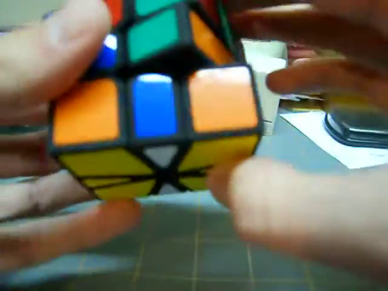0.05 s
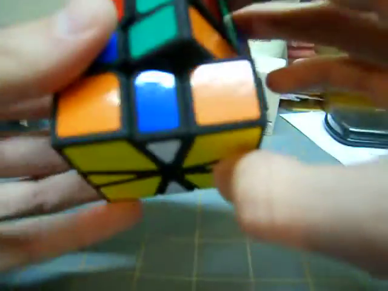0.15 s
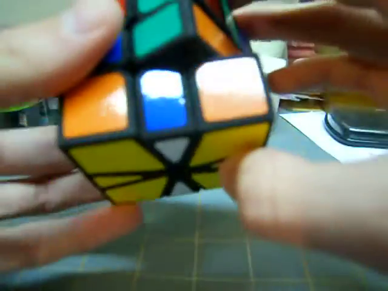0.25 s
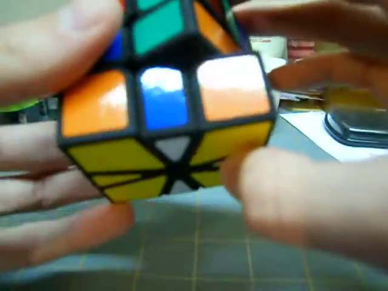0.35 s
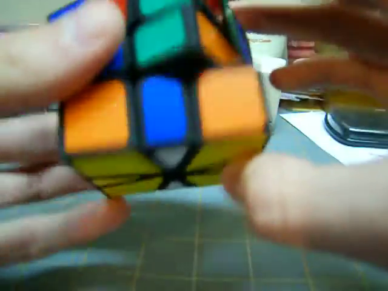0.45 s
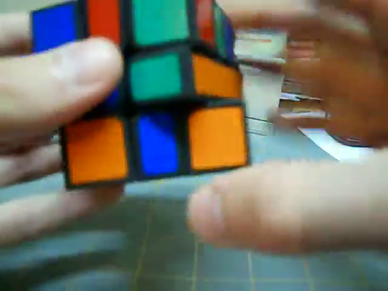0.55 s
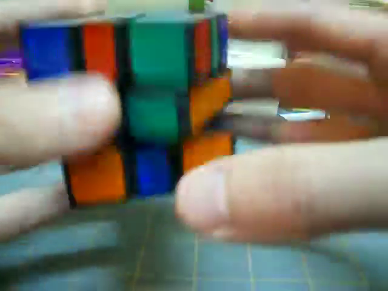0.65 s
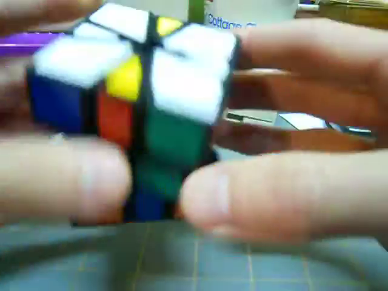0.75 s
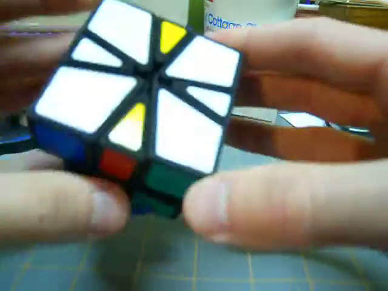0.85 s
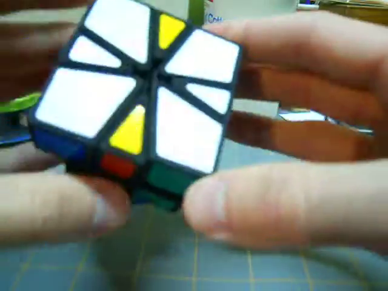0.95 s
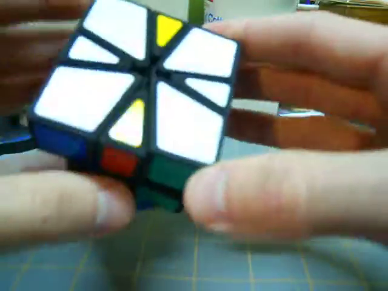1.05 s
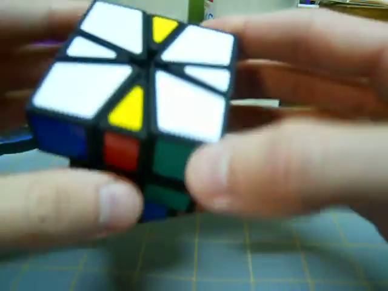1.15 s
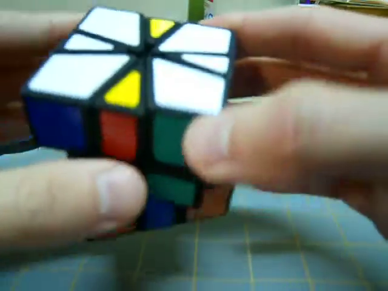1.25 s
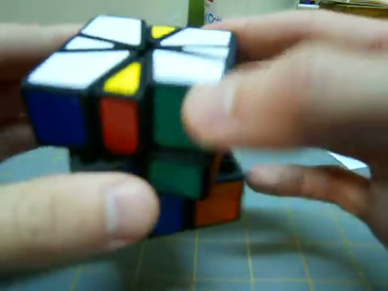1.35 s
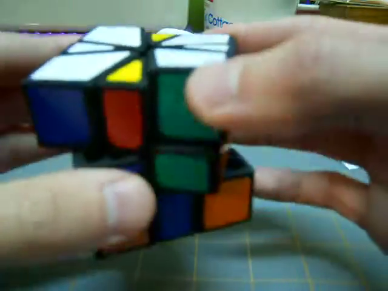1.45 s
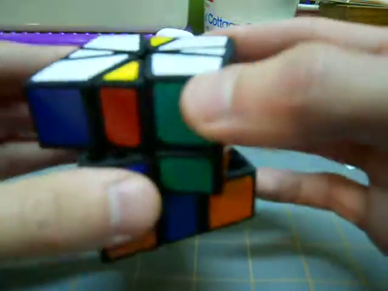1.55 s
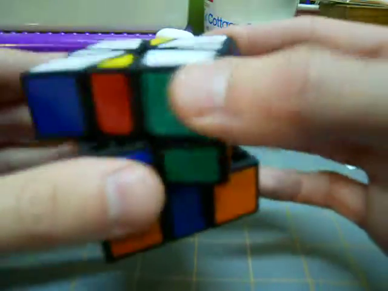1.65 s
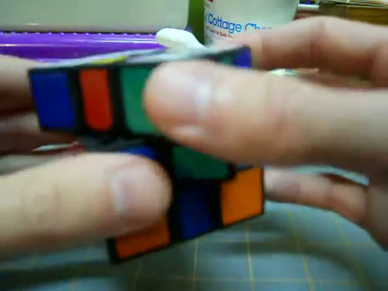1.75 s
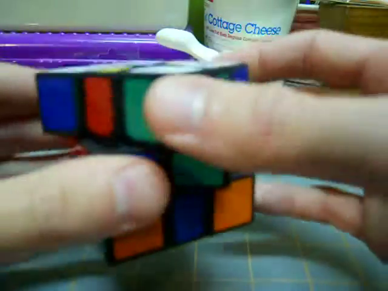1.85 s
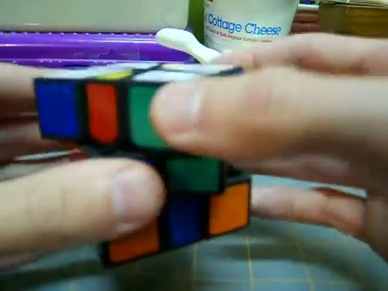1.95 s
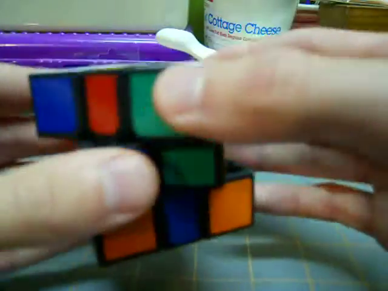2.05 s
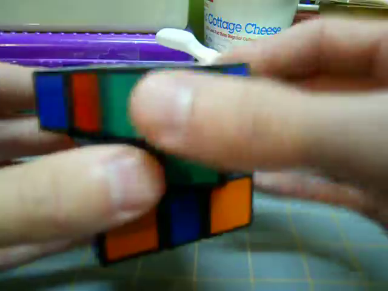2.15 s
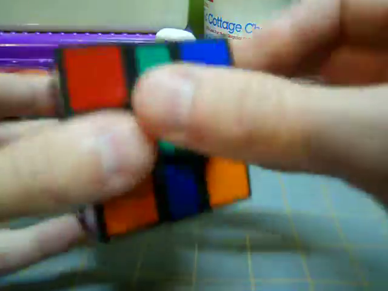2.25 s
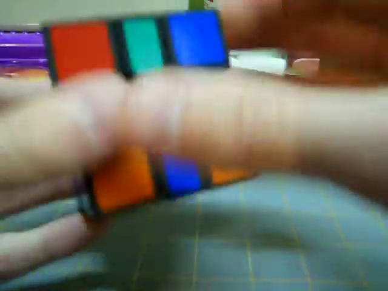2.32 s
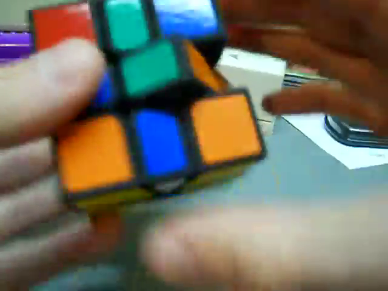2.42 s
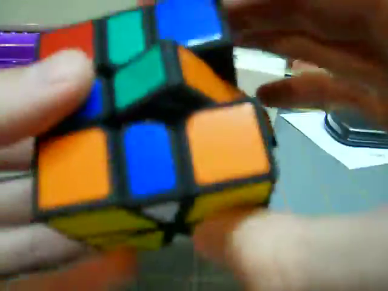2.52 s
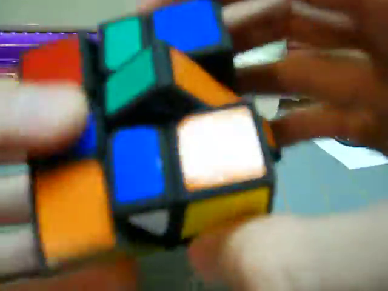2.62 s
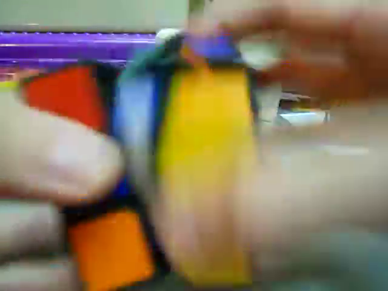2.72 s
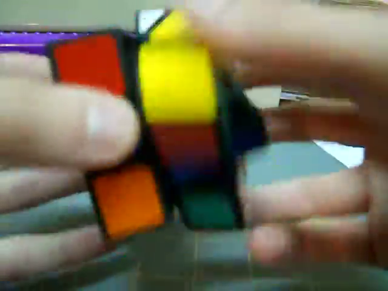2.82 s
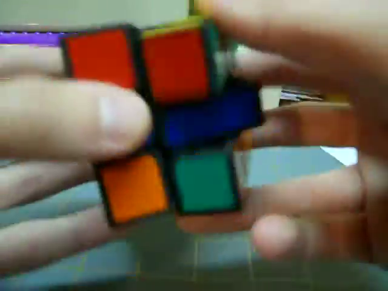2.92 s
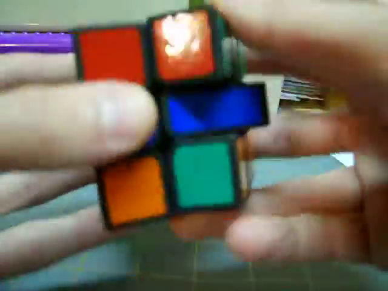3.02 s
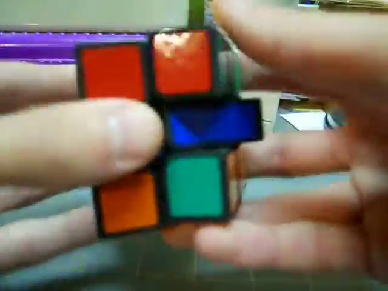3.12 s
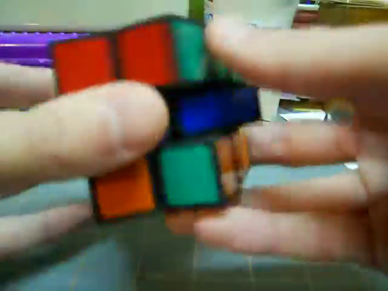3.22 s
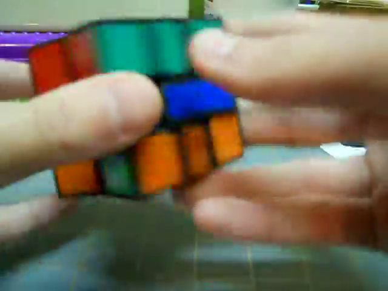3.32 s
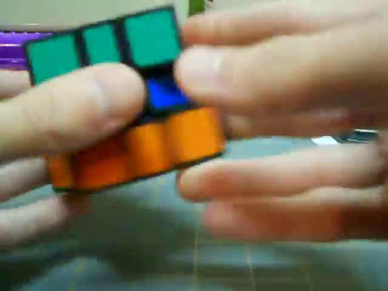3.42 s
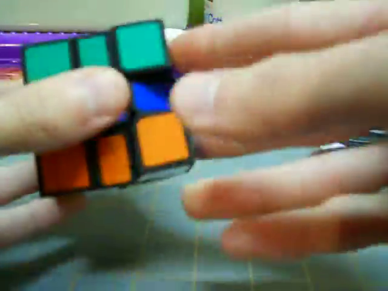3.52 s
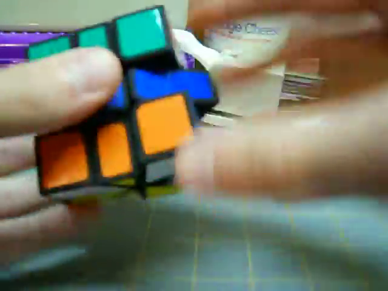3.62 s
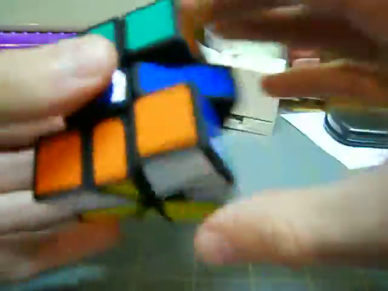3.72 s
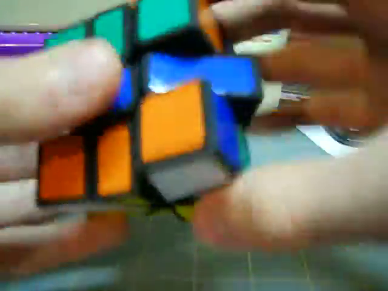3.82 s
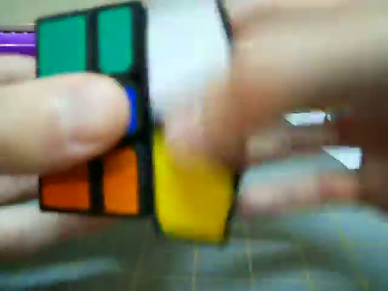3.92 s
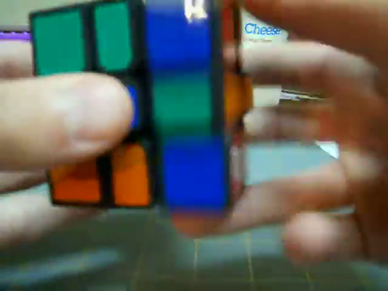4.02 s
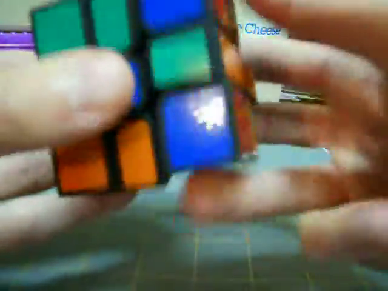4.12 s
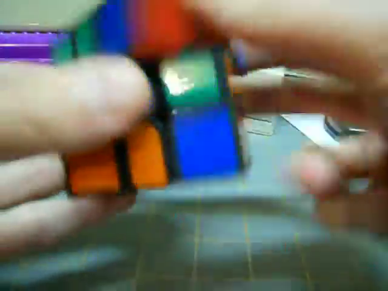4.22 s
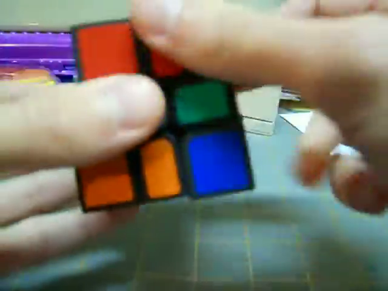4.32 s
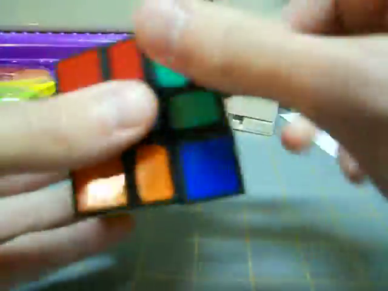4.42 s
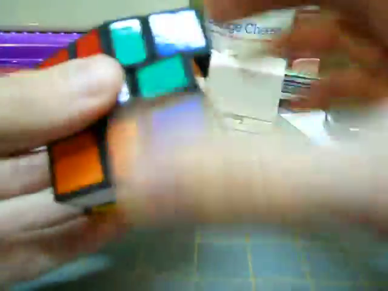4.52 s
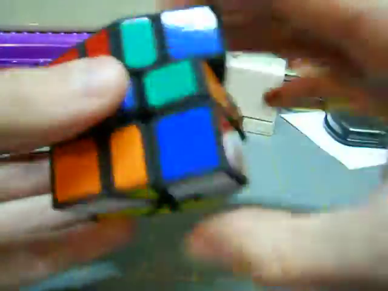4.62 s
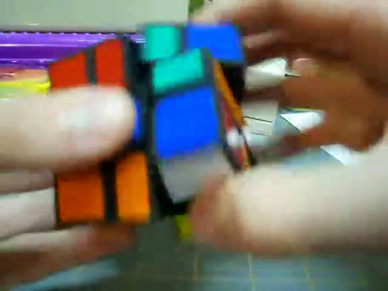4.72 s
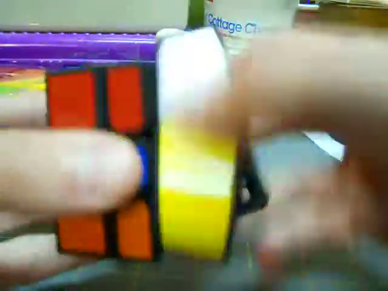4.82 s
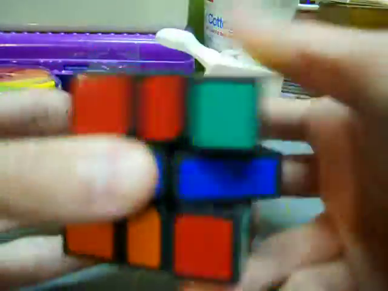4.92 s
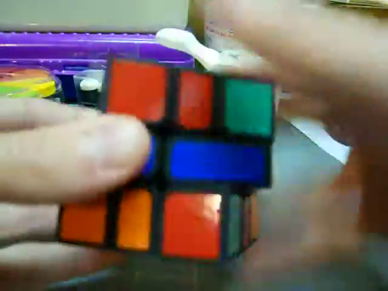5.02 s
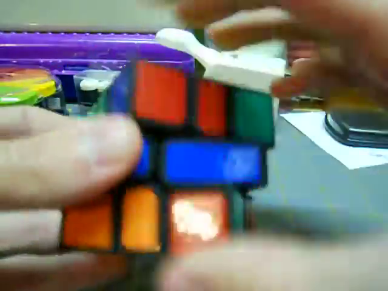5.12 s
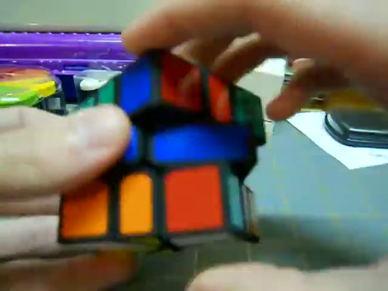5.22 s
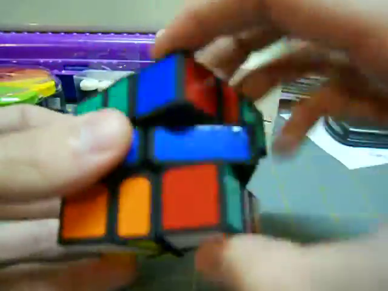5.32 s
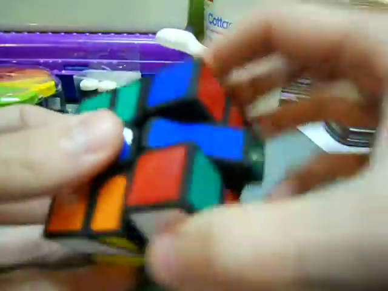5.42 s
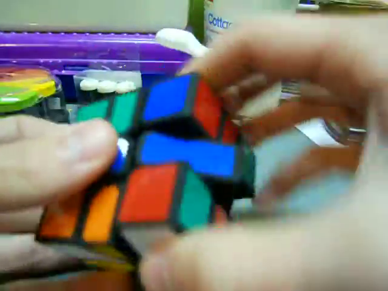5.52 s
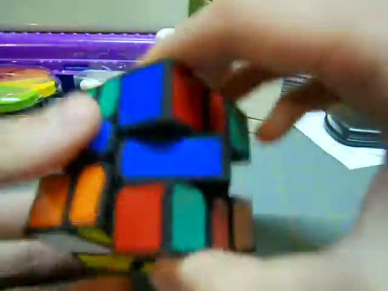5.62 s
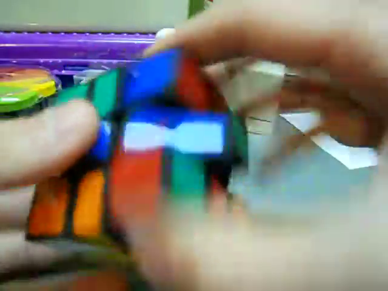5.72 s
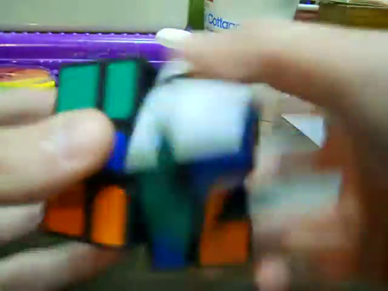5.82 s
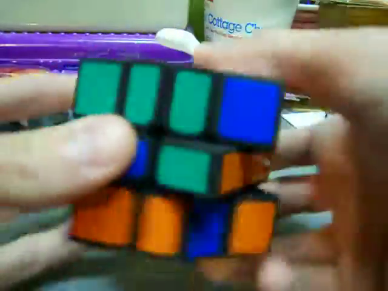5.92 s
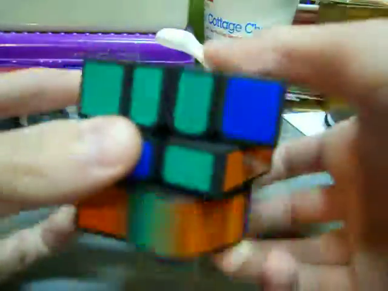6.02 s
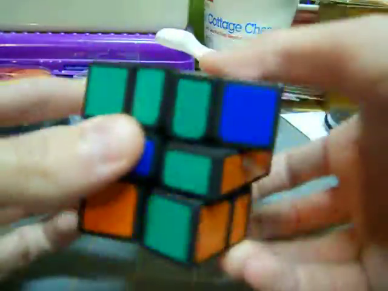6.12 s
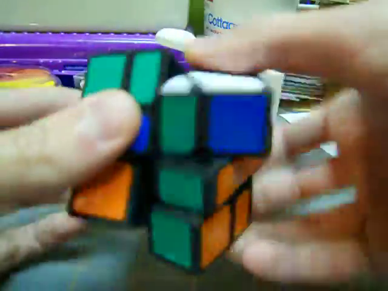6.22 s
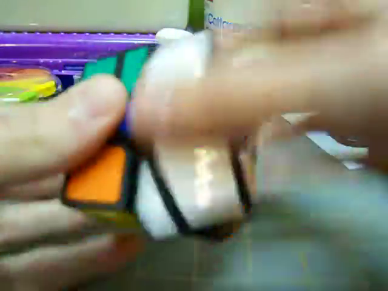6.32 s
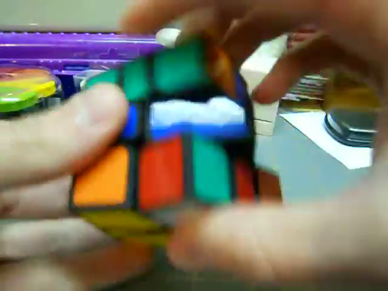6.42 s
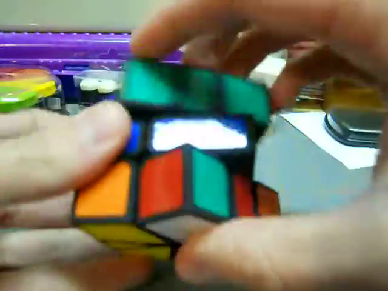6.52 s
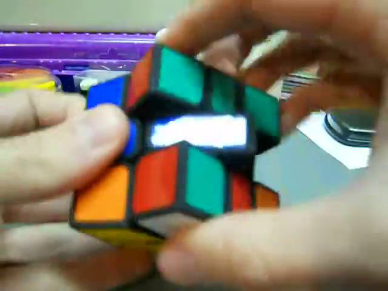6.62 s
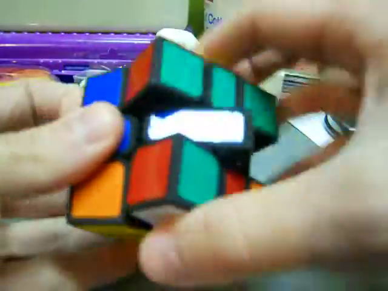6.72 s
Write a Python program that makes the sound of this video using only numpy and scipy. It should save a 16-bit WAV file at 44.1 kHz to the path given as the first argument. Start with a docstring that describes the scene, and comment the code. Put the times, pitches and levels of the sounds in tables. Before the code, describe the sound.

A plastic twisty puzzle is turned by hand close up, its layers scraping and clicking faintly, then in quick, louder runs.

```python
"""Faint plastic clicks and scrapes grow into the quick turning of a twisty puzzle, close to a desk microphone.
Its layers slide over each other by stick-slip friction, and the dense tiny impacts excite the
resonances of the hollow pieces; edges catch, snap home and chatter.
Behind it, quiet room noise and a low hum rise and fall with the recorder's automatic gain."""
import sys
import numpy as np
from scipy import signal
from scipy.fft import rfft, irfft, next_fast_len
from scipy.io import wavfile
from scipy.ndimage import map_coordinates

SR = 44100
rng = np.random.default_rng(int(sys.argv[2]) if len(sys.argv) > 2 else 0)


def store_wav(level_fs):
    """Save 16-bit WAV to argv[1]."""
    pcm = np.round(np.clip(np.atleast_2d(level_fs), -1, 1) * 32767)
    wavfile.write(sys.argv[1], SR, pcm.T.astype(np.int16))


N = 298116
TIME = np.arange(N) / SR
TOP_HZ = 9150  # upper band limit


def amp(db):
    """Amplitude ratio: a factor of ten for every 20 dB."""
    return 10 ** (np.asarray(db) / 20)


def unit(x):
    """Normalisation to an rms of 1."""
    return x / np.sqrt(np.mean(x ** 2) + 1e-20)


def wobble(knots_per_s, size):
    """Smooth random modulation: a spline through Gaussian values."""
    knots = rng.standard_normal(int(size * knots_per_s / SR) + 4)
    return map_coordinates(knots, [np.arange(size) * knots_per_s / SR])


def filtered(x, response):
    """Linear filtering: the spectrum of x times a complex frequency response."""
    size = next_fast_len(len(x) + 2048)
    return irfft(rfft(x, size) * response(np.fft.rfftfreq(size, 1 / SR)), size)[:len(x)]


def equalised(x, points):
    """Zero-phase filtering by (frequency_hz, gain_db) points on a log axis, cut off at TOP_HZ."""
    hz, db = np.transpose(points)
    return filtered(x, lambda f: amp(np.interp(np.log(f + 1), np.log(hz), db)) * (f < TOP_HZ))


def minimum_phase(magnitude):
    """Folding the cepstrum gives the quickest-decaying causal response of this magnitude."""
    cepstrum = irfft(np.log(magnitude + 1e-6))
    half = len(cepstrum) // 2
    cepstrum[1:half] *= 2
    cepstrum[half + 1:] = 0
    return np.exp(rfft(cepstrum))


def add(out, start_s, x):
    """Superposition: x joins out from start_s on."""
    start = max(round(start_s * SR), 0)
    out[start:start + len(x)] += x[:len(out) - start]


def background():
    """Gain control: steady room noise and hum rise and fall with the recorder's automatic gain."""
    # the recorder's automatic gain on the background, as a set curve: time_s, relative_gain_db
    automatic_gain = [(0.0, -70), (0.49, -71.5), (0.66, -66.5), (0.92, -59), (1.07, -59.5), (2.09, -57.5),
                      (2.31, -61.5), (3.11, -65), (3.44, -63.5), (3.78, -66), (4.25, -63.5), (4.8, -60.5),
                      (6.53, -65.5), (6.76, -64)]
    # spectral density of the room noise: frequency_hz, density_db
    air_spectrum = [(20, 1.5), (100, 1), (250, 0.5), (450, 0), (900, 0), (1500, -4), (2200, -3.5),
                    (4000, -5), (7500, -9.5)]
    hum_hz, hum_mean_db, hum_swing = 62.0, -65.5, 1.4  # the hum swings wider than the air
    gain_db = np.interp(TIME, *np.transpose(automatic_gain))
    hum_db = hum_mean_db + hum_swing * (gain_db - gain_db.mean())
    air = unit(equalised(rng.standard_normal(N), air_spectrum))
    phase = 2 * np.pi * hum_hz * TIME + 0.55 * wobble(6, N)
    hum = unit(np.sin(phase) * amp(1.5 * wobble(4.5, N)))
    return amp(gain_db + 11.5) * air + amp(hum_db) * hum


def walls(x, t60_s, wet_db):
    """Reverberation: reflections from the desk and near walls add an exponentially decaying tail."""
    t = np.arange(SR // 3) / SR
    tail = rng.standard_normal(len(t)) * amp(-60 * t / t60_s) * (t > .002)
    return x + amp(wet_db) * signal.fftconvolve(x, tail / np.linalg.norm(tail))[:N]


def shell(force, ring_hz, scatter_db):
    """Modal resonance: a force rings the hollow pieces, which are too small to radiate much bass."""
    # resonances of the hollow plastic: centre_hz, bandwidth_hz, gain_db
    modes = [(643, 240, -13), (936, 256, -8.5), (1387, 226, 0.5), (1580, 180, -14), (2540, 250, -2.5),
             (3044, 280, 3.5), (3640, 730, -4), (4060, 380, -19), (4900, 1300, -16.5), (6180, 1300, -12.5),
             (7000, 1700, -21)]
    nominal_ring_hz, radiation_corner_hz = 3100, 512
    hz, widths, db = np.transpose(modes)
    in_contact = (hz > 2100) & (hz < 4600)  # these modes follow the pitch of the touching piece
    hz = np.where(in_contact, hz * ring_hz / nominal_ring_hz, hz)
    gains = amp(db + scatter_db * rng.standard_normal(len(hz)))

    def response(f):
        power = sum((gain * f * width) ** 2 / ((centre ** 2 - f ** 2) ** 2 + (f * width) ** 2)
                    for centre, width, gain in zip(hz, widths, gains))
        radiation = 1 / np.sqrt(1 + (radiation_corner_hz / (f + 1)) ** 6)
        return minimum_phase(np.sqrt(power) * radiation) * (f < TOP_HZ)

    return filtered(force, response)


def voiced(x, body_db, edge_db):
    """Spectral balance: the hollow low band and bright high band are set relative to the main ring."""
    lowpass = lambda f, corner_hz: 1 / (1 + (f / corner_hz) ** 12)
    body = filtered(x, lambda f: lowpass(f, corner_hz=2000))
    edges = filtered(x, lambda f: 1 - lowpass(f, corner_hz=4600))
    ring = x - body - edges
    return unit(ring) + amp(body_db) * unit(body) + amp(edge_db) * unit(edges)


def slips(size, per_s, spread_db, rub):
    """Stick-slip force: a Poisson train of tiny impulses over the white noise of smooth rubbing."""
    hits = rng.random(size) < per_s / SR
    strength = amp(spread_db * np.clip(rng.standard_normal(size), -2, 2))
    direction = rng.choice([-1, 1], size)
    return unit(hits * strength * direction) + rub * rng.standard_normal(size)


def clicks():
    """Impact excitation: an edge grazes and snaps home, then loose pieces chatter for milliseconds."""
    # edges catching and seating: time_s, nominal_peak_db, ring_hz, body_db, edge_db
    impacts = [(0.013, -31.5, 3080, -16, -13), (0.211, -34, 2990.0, -7, -7), (0.222, -34, 3060, -4, -12),
               (0.316, -35.5, 3050, -8, -14), (0.488, -32, 3100.0, -8, -17), (0.505, -31, 2810.0, -4.5, -7),
               (0.53, -40, 3080.0, -11, -27), (0.748, -20.5, 2850, -4.5, -8), (0.771, -29, 3030, 0, -18),
               (0.913, -23.5, 3400, 0, -6), (0.919, -25, 3350.0, 4, -12), (1.077, -33.5, 3140.0, 6, 4),
               (1.341, -22.5, 3220, -7.5, -6), (1.572, -22.5, 3560, -13, -15), (1.671, -26, 3260.0, 2, -1),
               (1.898, -23, 3370, -6, -4.5), (2.25, -7, 3370.0, -14, -10), (2.262, -4.5, 3020, -7, -12.5),
               (2.33, -38, 3250.0, 4, -10), (2.348, -34, 3210.0, -8, -13), (2.364, -32.5, 2790.0, 6, -7),
               (2.543, -31, 3050, 7, -4), (2.571, -17, 2900, 1, -16), (2.576, -22.5, 2790.0, -15, -16),
               (2.637, -21.5, 3280, -4.5, -8), (2.67, -17, 2700, -1, -7), (2.765, -10, 3020.0, -6, -19),
               (2.776, -5, 3040, -18, -15), (2.791, -5.5, 2800, -12, -8.5), (2.818, -4.5, 2860, -4, -5),
               (2.862, -15, 3230, -6, -10), (2.877, -7.5, 3270, -24, -12), (3.052, -28, 3050, -2, -11),
               (3.092, -27, 3000, -1, -3), (3.134, -30, 3030, -6, -7), (3.177, -30, 3500.0, -12, -8),
               (3.197, -21.5, 3020.0, -8, -8), (3.272, -16.5, 3070.0, 1, -15), (3.63, -34, 3070, -1, -12),
               (3.648, -24.5, 3340, -7, -13), (3.824, -20, 3300, -4, -12), (3.859, -27, 3050.0, -3, -7),
               (3.883, -26.5, 3160.0, -6, -7), (3.916, -8.5, 3360.0, -15, -13.5),
               (3.992, -14, 3170, -8, -19), (4.167, -16, 3080, -9.5, -20), (4.282, -3, 3420, -17.5, -7),
               (4.442, -12.5, 2900, -9, -15), (4.533, -20, 3320.0, -9, -22),
               (4.701, -16.5, 3250, -11, -8.5), (4.735, -9.5, 2660, -13, -13), (4.75, -17, 2770.0, -6, -14),
               (5.051, -14, 3020, 0, -11), (5.167, -12, 2980, 3, -9), (5.227, -22, 3100, -14, -18),
               (5.34, -23.5, 3260, -8, -7), (5.384, -19.5, 3200, -3.5, -8),
               (5.398, -18.0, 3100.0, -10, -13), (5.418, -20, 3250, -19.5, -9.5),
               (5.44, -11, 3230, -20, -13), (5.457, -16.5, 3530, -10.5, -9), (5.47, -15.5, 3190.0, -4, -8),
               (5.576, -18, 3180.0, -3.5, -12), (5.597, -5.5, 2750, -11, 3), (5.601, -2.5, 2750, -6.5, -14),
               (5.658, -17.5, 2910.0, -3.5, -12), (5.685, -17, 3010.0, -5, -11),
               (5.738, -24, 3000, -11, -20), (5.785, -11, 2980.0, -11.5, -14),
               (5.798, -4.5, 3280, -18, -16), (5.828, -8.5, 3080, -17, -3.5),
               (5.861, -4.5, 2910.0, -4.5, -16), (5.879, -5.5, 2970, -10, -17.5),
               (5.889, -4.5, 3350.0, -14, -2), (6.178, -25.5, 2890.0, 2, -8),
               (6.426, -4.5, 3270, -14, -7.5), (6.469, -11, 3300, -9, -14), (6.54, -10.5, 2860, 1.5, -1),
               (6.559, -18.5, 3200.0, -5, -6), (6.719, -23, 2950, -2, -9)]
    chatter_t60_s, graze_share = 0.021, 0.45  # the graze builds in this share of the decay time
    crest_factor_db = 20.5  # nominal peak over rms
    lead = SR // 100
    t = np.arange(-lead, 3 * lead) / SR
    envelope = amp(-60 * np.maximum(t, -t / graze_share) / chatter_t60_s)
    out = np.zeros(N)
    for time_s, nominal_peak_db, ring_hz, body_db, edge_db in impacts:
        force = slips(len(t), per_s=2500, spread_db=0, rub=0.8) * envelope
        force[lead] += 9  # the snap
        click = voiced(shell(force, ring_hz, scatter_db=0.5), body_db, edge_db)
        add(out, time_s + t[0], amp(nominal_peak_db - crest_factor_db) * unit(click))
    return out


def scrapes():
    """Sliding friction: a layer slips over ridges and burrs, louder as the finger presses harder."""
    # slides of a layer: start_s, crest_s, stop_s, crest_db, swell_db, ring_hz, body_db, edge_db
    strokes = [(0.0, 0.057, 0.089, -49.0, 5, 3080.0, -8.5, -6.5),
               (0.909, 0.916, 0.923, -40.5, 3, 3380.0, -1, -6),
               (1.343, 1.355, 1.393, -44.5, 8, 3220.0, -2, -9),
               (1.45, 1.457, 1.464, -39.5, 6.5, 2980, -0.5, -7.5),
               (1.58, 1.605, 1.646, -43, 6, 3250.0, -4, -8),
               (1.683, 1.756, 1.866, -29.5, 20, 3250, -5.5, -9),
               (1.926, 1.948, 1.966, -44.5, 9, 3430, -6, -7.5),
               (1.999, 2.017, 2.085, -40.0, 7.5, 3220.0, -6.5, -7),
               (2.161, 2.232, 2.237, -23.0, 17.5, 3340.0, -7, -9.5),
               (2.235, 2.258, 2.27, -13.5, 8, 3320.0, -9, -6.5),
               (2.403, 2.411, 2.432, -43, 12, 3150, -7, -6), (2.569, 2.571, 2.578, -29, 5, 2850, -8.5, -16),
               (2.636, 2.76, 2.76, -30, 12.5, 3000, -5.5, -11),
               (2.763, 2.806, 2.82, -14, 7, 3080.0, -11, -10),
               (2.849, 2.859, 2.928, -21, 17, 3080, -10, -10.5),
               (2.954, 3.002, 3.034, -29.5, 28.5, 3090.0, 0, -9),
               (3.168, 3.206, 3.234, -38.5, 12, 2970, -5, -8),
               (3.239, 3.279, 3.319, -32.5, 10.5, 3060.0, -5, -7.5),
               (3.325, 3.372, 3.413, -25.0, 13.5, 2990, -6.5, -7.5),
               (3.416, 3.432, 3.479, -23.5, 12, 2990, -5.5, -9.5),
               (3.475, 3.487, 3.546, -29.5, 9, 3120, -5.5, -9.5),
               (3.912, 3.92, 4.022, -21, 6.5, 3080, -11, -12),
               (4.018, 4.051, 4.105, -16.5, 15.5, 3090, -12.5, -10),
               (4.208, 4.301, 4.395, -24, 18, 3070, -6.5, -9),
               (4.422, 4.454, 4.48, -23, 13, 3100, -9.5, -12),
               (4.508, 4.516, 4.588, -43.5, 4.5, 3250.0, -3.5, -9.5),
               (4.701, 4.744, 4.76, -34.5, 4.5, 2960, -3, -9),
               (4.766, 4.895, 4.958, -15.5, 9.5, 3110, -10, -10),
               (4.976, 4.992, 5.044, -31.5, 10, 2970, -1.5, -7),
               (5.053, 5.08, 5.096, -28.5, 7.5, 3170.0, -4, -10),
               (5.111, 5.189, 5.219, -33.5, 13.5, 3050, -4, -10.5),
               (5.249, 5.261, 5.272, -21, 8, 3120, -7.5, -7),
               (5.355, 5.51, 5.506, -39.5, 3.5, 3150, -5.5, -10),
               (5.594, 5.604, 5.603, -19, 11, 2820, -7, -6),
               (5.607, 5.645, 5.663, -35, 7.5, 3060.0, -3, -8),
               (5.677, 5.701, 5.727, -28.5, 16.5, 3010, -5, -10.5),
               (5.778, 5.83, 5.902, -21, 2, 3110.0, -10.5, -6.5),
               (5.9, 5.943, 5.958, -26.0, 3, 3070, -9.5, -10),
               (5.968, 5.983, 6.034, -31.5, 8.5, 3300, -4.5, -8),
               (6.036, 6.096, 6.112, -19, 22, 3080, -9, -5.5),
               (6.121, 6.163, 6.162, -41.5, 13, 2920, -5, -8),
               (6.189, 6.235, 6.27, -31.0, 17, 2940.0, -1.5, -7),
               (6.288, 6.356, 6.375, -22.0, 16, 3100.0, -7, -7),
               (6.362, 6.38, 6.477, -22.5, 2.5, 3060, -8.5, -11),
               (6.494, 6.567, 6.585, -26.5, 16.5, 3200, -4.5, -8),
               (6.582, 6.602, 6.663, -33.5, 11.5, 3100, -3.5, -9.5)]
    grip_s, release_s, fade_db = 0.012, 0.01, 25
    burr_db = -8  # relative to the fine slips
    piece_detune, handovers_per_s = 0.029, 23.2  # contact wanders between a lower and a higher piece
    body_per_db = -0.19  # lighter pressure sounds hollower
    out = np.zeros(N)
    for start_s, crest_s, stop_s, crest_db, swell_db, ring_hz, body_db, edge_db in strokes:
        t = np.arange(max(start_s - grip_s, 0), stop_s + release_s, 1 / SR)
        # the finger grips, presses up to 0 dB at the crest, eases off and lets go
        corners_s = np.maximum.accumulate([start_s - grip_s, start_s, crest_s, stop_s, stop_s + release_s])
        loose_db = -swell_db - fade_db
        press_db = np.interp(t, corners_s, [loose_db, -swell_db, 0, -swell_db, loose_db])
        fine = unit(slips(len(t), per_s=1100, spread_db=0.5, rub=0.8))
        fine *= amp(1.22 * wobble(131, len(t)))
        force = fine + amp(burr_db) * slips(len(t), per_s=110, spread_db=1.5, rub=0)
        high_share = (1 + np.tanh(2 * wobble(handovers_per_s, len(t)))) / 2
        low = shell(force, ring_hz * (1 - piece_detune), scatter_db=0.7)
        high = shell(force, ring_hz * (1 + piece_detune), scatter_db=0.7)
        hollow_db = body_db + body_per_db * (press_db + swell_db / 3)
        scrape = voiced(low + high_share * (high - low), hollow_db, edge_db)
        add(out, t[0], amp(crest_db + press_db + 0.23) * scrape)
    return out


def scene():
    """Superposition of the puzzle, its reflections and the room noise, in one channel."""
    puzzle = walls(scrapes() + clicks(), t60_s=0.17, wet_db=-20.5)
    return (puzzle + background())[None]


def record(dry):
    """Saturation and band limiting: the small microphone rounds peaks and loses the top treble."""
    # treble response of the microphone: frequency_hz, gain_db
    treble_rolloff = [(7450, -0.5), (7750, -8), (8050, -15.5), (8500, -14), (8800, -23.5), (9150, -41)]
    ceiling = 0.7
    rounded = dry[0] / (1 + np.abs(dry[0] / ceiling) ** 4) ** (1 / 4)
    return equalised(rounded, treble_rolloff)[None]


dry = scene()
out = record(dry)
store_wav(out)
```